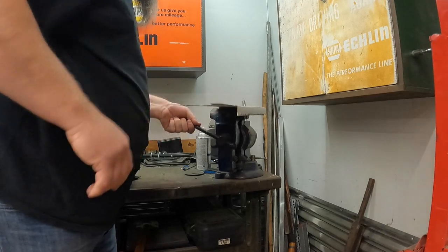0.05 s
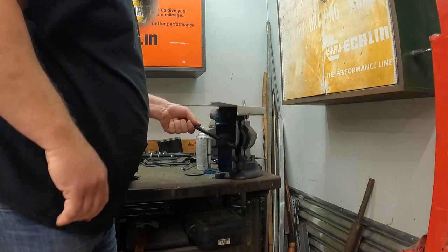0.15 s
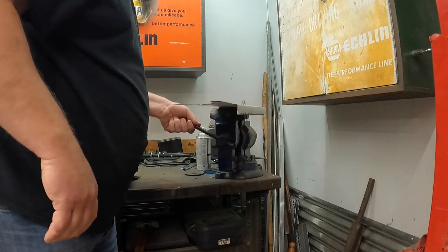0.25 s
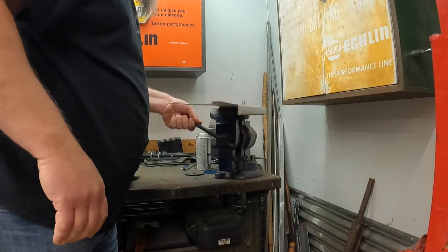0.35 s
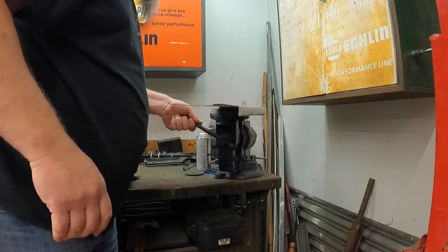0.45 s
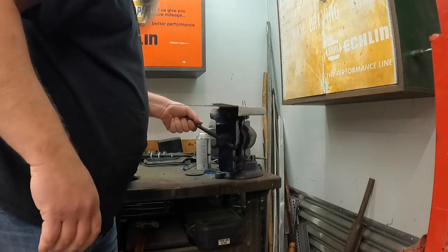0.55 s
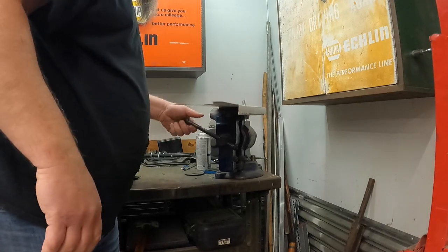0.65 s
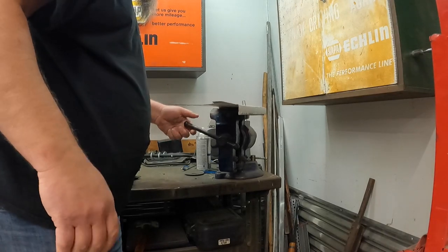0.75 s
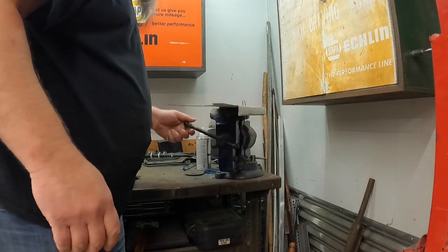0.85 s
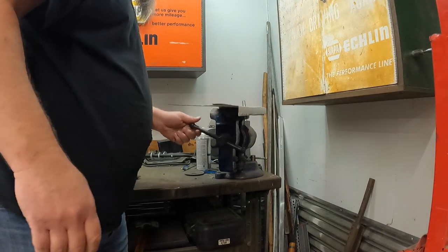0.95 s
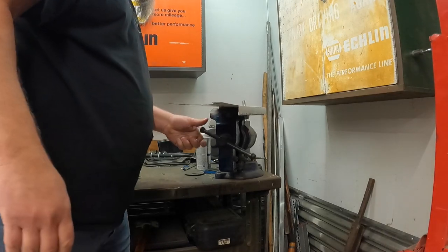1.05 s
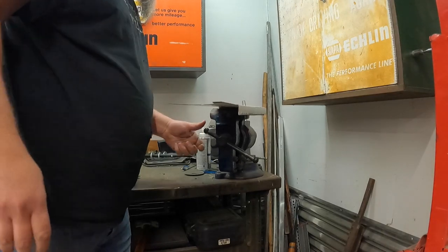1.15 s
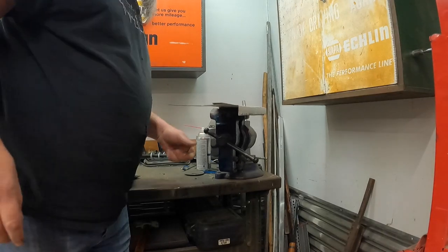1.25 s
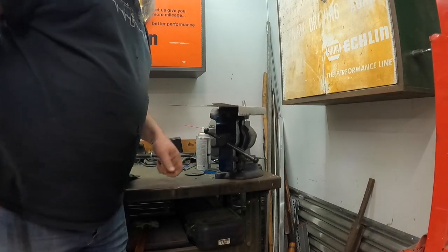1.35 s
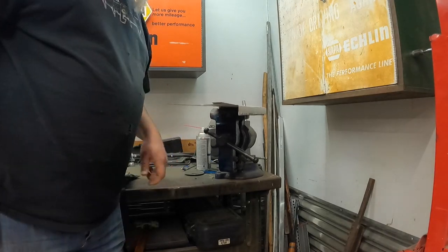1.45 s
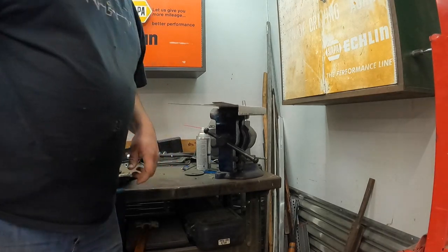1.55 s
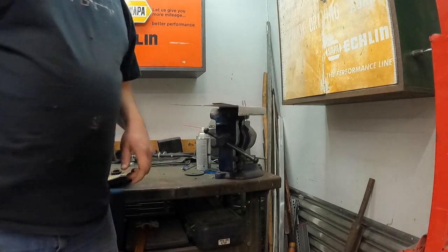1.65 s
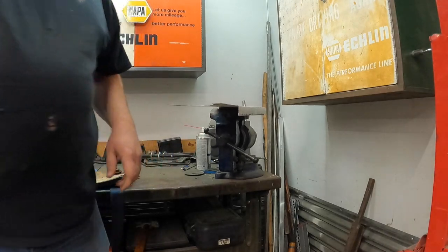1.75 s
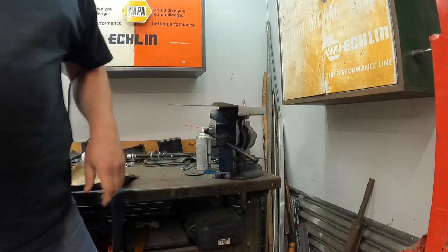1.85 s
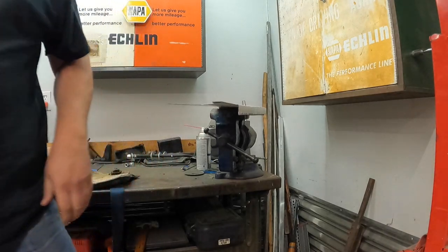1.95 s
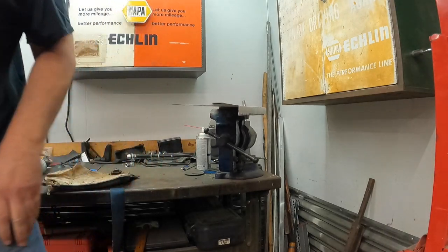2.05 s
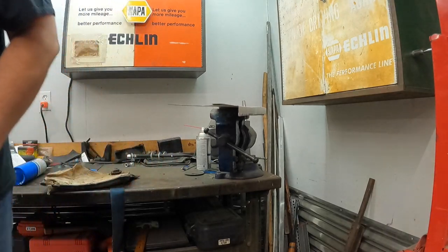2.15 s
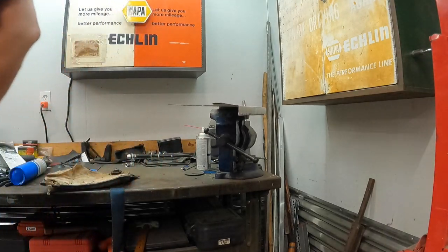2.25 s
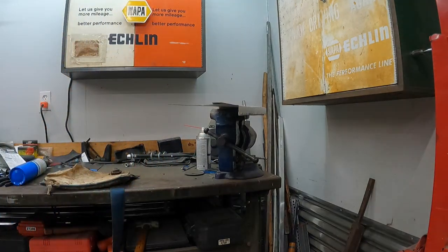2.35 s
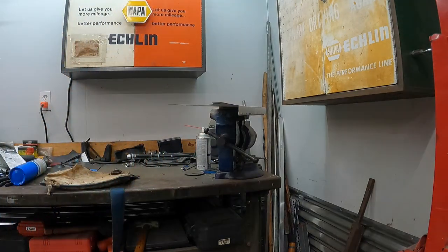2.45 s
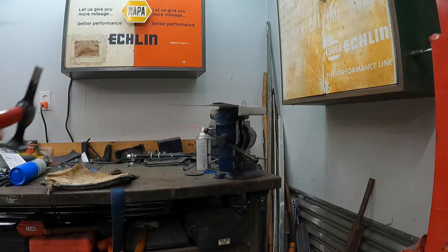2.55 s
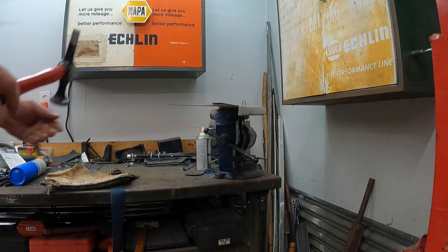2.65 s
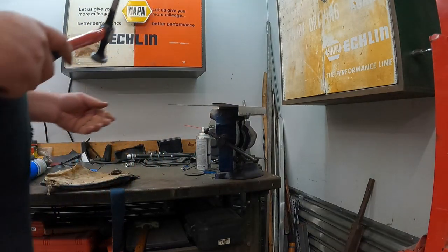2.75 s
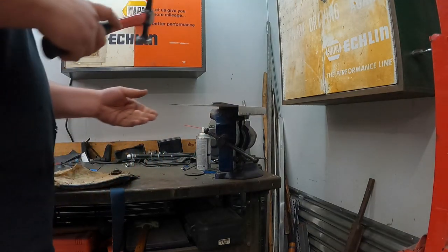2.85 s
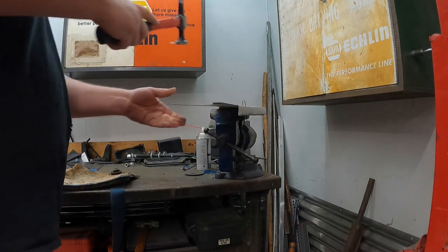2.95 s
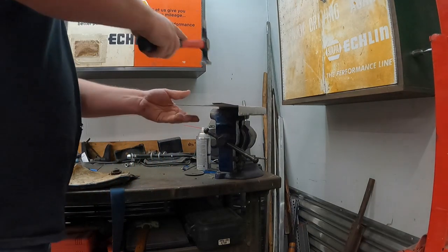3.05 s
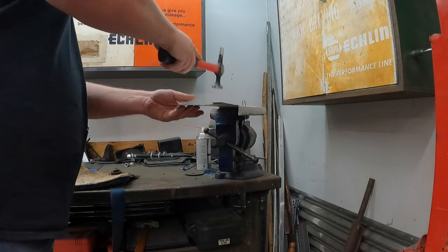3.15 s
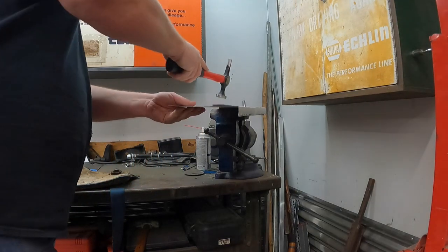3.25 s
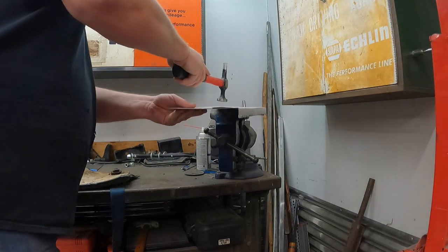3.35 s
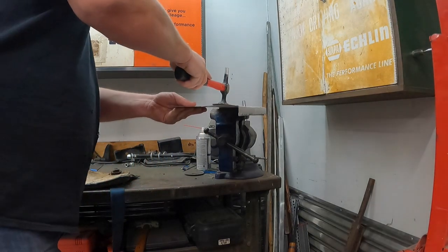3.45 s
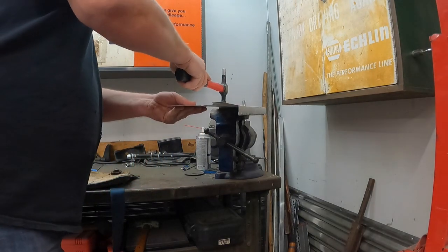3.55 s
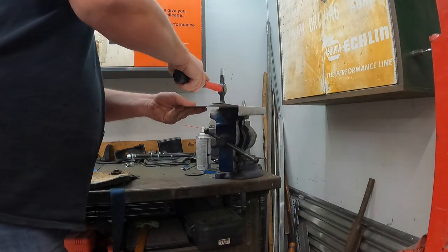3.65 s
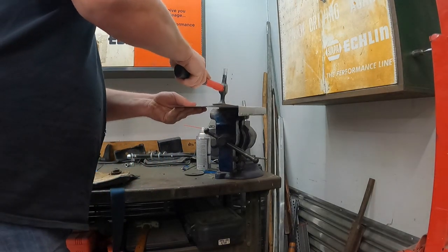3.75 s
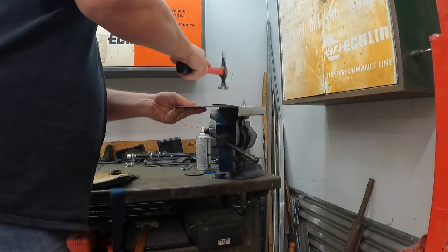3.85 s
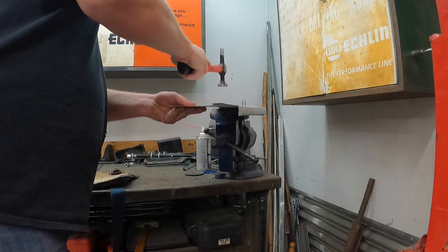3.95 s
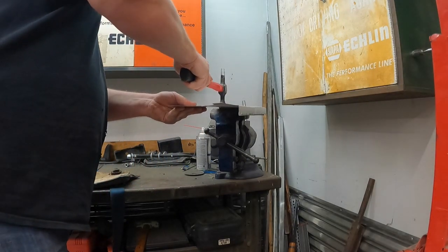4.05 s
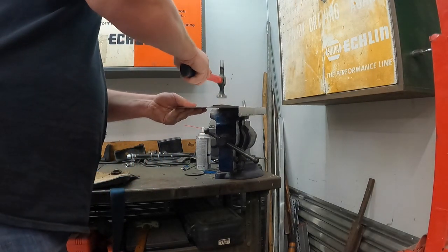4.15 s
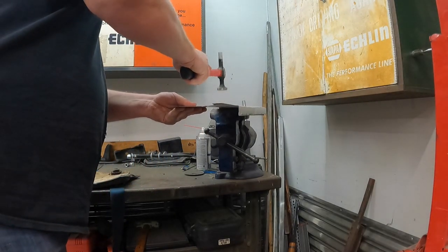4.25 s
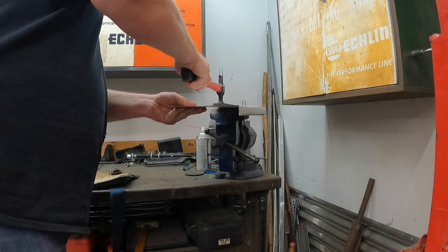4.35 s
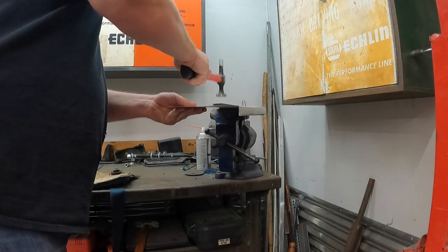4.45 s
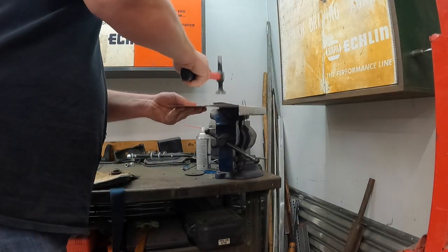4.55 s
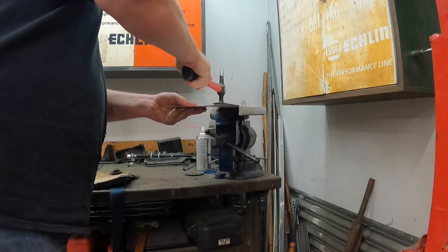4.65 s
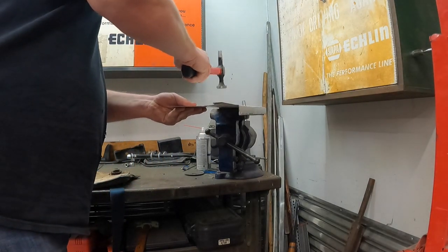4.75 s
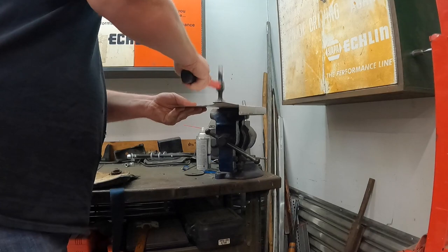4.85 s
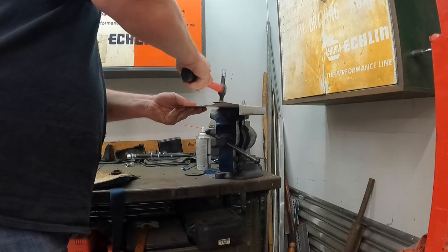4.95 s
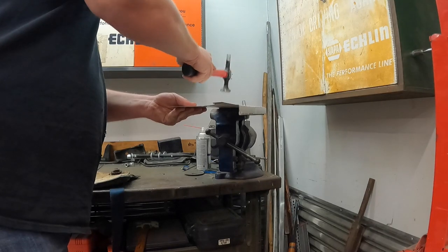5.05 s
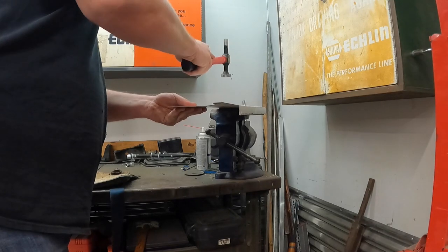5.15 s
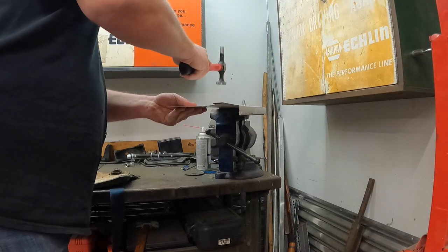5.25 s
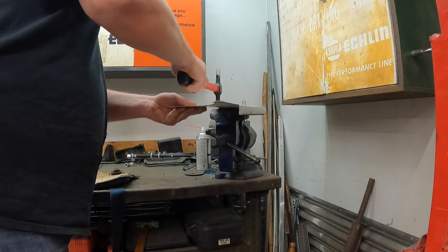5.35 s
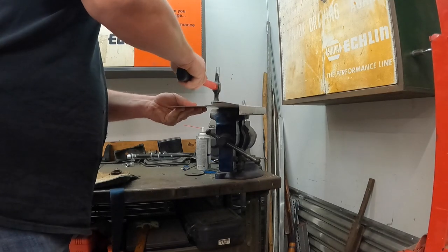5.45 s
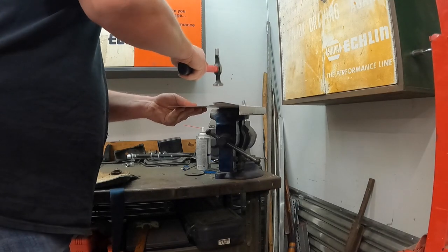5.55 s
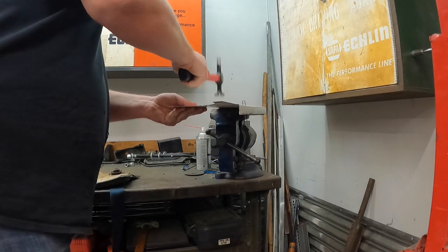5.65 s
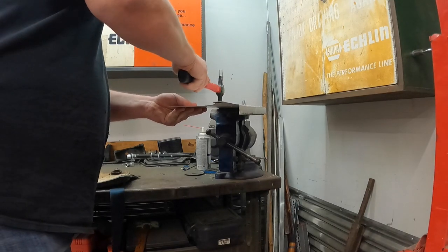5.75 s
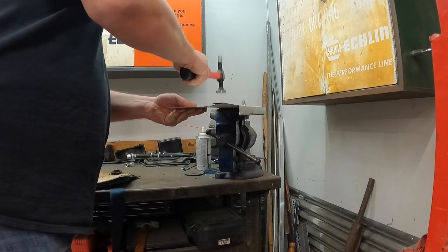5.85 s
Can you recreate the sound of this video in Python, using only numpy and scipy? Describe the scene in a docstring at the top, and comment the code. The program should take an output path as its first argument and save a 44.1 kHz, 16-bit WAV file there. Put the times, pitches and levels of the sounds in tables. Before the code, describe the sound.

Someone moves close to a camera microphone at a workbench: clothing brushes, feet thud softly, and a loose steel bar slides and clacks in a vise at about one second. A quieter stretch of steps and cloth follows. From three and a half seconds, sharp hammer knocks on sheet steel ring briefly, with hollow vise clonk, occasional bench thud and a short hard room tail.

```python
"""Mains hum, low rumble and brushing cloth open the scene, with the soft knock of a vise closing on a steel sheet.
Dull footfalls follow; the steel vise handle scrapes through its hole and knocks against its stop.
Then a hammer strikes the sheet eight times, rebounding once: noise makes the crack and clang, decaying sines
ring sheet, vise and bench, and decaying noise bands answer as the room. Gain control pulls loud passages down."""
import sys
import numpy as np
from scipy import signal
from scipy.fft import rfft, irfft, next_fast_len
from scipy.io import wavfile

SR = 44100
rng = np.random.default_rng(int(sys.argv[2]) if len(sys.argv) > 2 else 0)


def master(y):
    """Save y as 16-bit WAV."""
    cut = np.clip(np.atleast_2d(y).T, -1, 1)
    pcm = np.round(cut * 32767)  # scale
    wavfile.write(sys.argv[1], SR, pcm.astype(np.int16))


N = 260631
TIME = np.arange(N) / SR
AGE = TIME[:2 * SR]  # time since the onset of a single event


def undb(db):
    """Decibels to amplitude gain."""
    return 10 ** (np.asarray(db) / 20)


def across(points, hz):
    """Read (Hz, value) points on a log-frequency axis."""
    f, value = np.transpose(points)
    return np.interp(np.log(hz + 1), np.log(f), value)


def fade(t60_s):
    """Exponential decay, 60 dB down after t60_s."""
    return np.exp(-np.log(1000) * AGE / t60_s)


# Unrelated share between the two microphone ports. Each row: frequency in Hz, side level in dB before widening.
PORT_WIDTH = [(50, -35.5), (150, -23.5), (400, -15.5), (1000, -12.5), (2000, -11), (5000, -12.5),
              (8000, -13.5), (12500, -6)]


def noise(colour, size, wide_db=0):
    """Coloured stereo noise of rms 1; a weak independent side signal sets the ports apart."""
    hz = np.fft.rfftfreq(size, 1 / SR)
    white = rfft(rng.standard_normal((2, size)))
    mid, side = white * undb(across(colour, hz)) * hz / (hz + 20)
    side = side * undb(across(PORT_WIDTH, hz) + wide_db)
    x = irfft([mid + side, mid - side], size)
    return x / x.std()


def tilted(x, slope_db, pivot_hz=2000):
    """Tilt the spectrum by about slope_db per octave: harder contact gives more treble."""
    size = 2 * len(AGE)
    hz = np.fft.rfftfreq(size, 1 / SR)
    tilt = undb(slope_db * np.log2((hz + 100) / pivot_hz))
    return irfft(rfft(x, size) * tilt)[:, :len(AGE)]


def ring(modes, scatter_db):
    """Decaying sine modes; each strike weights them anew, and each port hears its own phase."""
    out = np.zeros((2, len(AGE)))
    draws = rng.standard_normal((len(modes), 3))
    for (hz, db, t60_s), (size, turn, skew) in zip(modes, draws):
        t = AGE[AGE < 1.5 * t60_s]
        decay_per_s = np.log(1000) / t60_s
        wave = np.exp((2j * np.pi * hz - decay_per_s) * t + 1j * np.pi * turn)
        ports = np.exp(.18j * skew * np.array([1, -1]))
        out[:, :len(t)] += undb(db + scatter_db * size) * np.outer(ports, wave).imag
    return out


def crowded_modes(spacing_hz, depth_db):
    """Gain per frequency of a body with countless small resonances; mean power 1."""
    hz = np.fft.rfftfreq(len(AGE), 1 / SR)
    heights = rng.uniform(-1, 1, len(hz))
    gain = undb(depth_db * np.interp(hz / max(spacing_hz, 1), np.arange(len(hz)), heights))
    return gain / np.sqrt(np.mean(gain ** 2))


def through(x, modes, width_hz):
    """Pass a sound through a body's resonances, keeping its level."""
    hz = np.fft.rfftfreq(x.shape[1], 1 / SR)
    body = sum(undb(db) / (1 + 2j * (hz - f) / width_hz) for f, db, _ in modes)
    y = irfft(rfft(x) * body, x.shape[1])
    return y * x.std() / y.std()


def swells(rows):
    """Gain over time of movements that each build up to a peak and die away."""
    power = 0
    for s, db, rise_s, t60_s in rows:
        before, after = np.maximum(s - TIME, 0), np.maximum(TIME - s, 0)
        shape = np.exp(-(before / rise_s) ** 2 - np.log(1000) * after / t60_s)
        power = power + (undb(db) * shape) ** 2
    return np.sqrt(power)


def add(track, s, x):
    """Mix a sound in at time s."""
    start = max(int(s * SR), 0)
    track[:, start:start + x.shape[1]] += x[:, :N - start]


RUMBLE_DB, HUM_DB, MAINS_HZ = -51.5, -46.5, 60
# Still air. Each row: frequency in Hz, density in relative dB per Hz.
AIR_COLOUR = [(60, -2), (90, -6), (180, -11.5), (300, -18.5), (520, -20.5), (800, -26.5), (1500, -24),
              (5000, -35.5), (9000, -45.5), (15000, -64.5)]
AIR_DB = -62.5
# Air pushed against the microphone as the body passes close.
# Each row: peak time in seconds, level in dB, rise in seconds, t60 in seconds.
GUSTS = [(.6, -46.5, 0.22, .8), (2.99, -46, 0.076, 0.43)]
# Steel on the bench still singing from being handled. Each row: frequency in Hz, level in dB, t60 in seconds.
SINGING_MODES = [(485, -48.5, 2.2), (553, -56.5, 2.8), (342, -55, 2.2), (720, -54, 0.6)]


def workshop():
    """Mains hum with its third harmonic, air noise, rumble swelling with gusts, and decaying steel modes."""
    turn = 2 * np.pi * MAINS_HZ * TIME
    third = np.sin(3 * turn)
    hum = np.sqrt(2) * undb(HUM_DB) * (np.sin(turn) + undb(-16.5) * third)
    hum = hum * undb([[-1.1], [1.1]])  # stronger on the right
    rumble_colour = [(20, -9), (45, 5.5), (80, -3), (150, -12), (300, -24.5), (1000, -70.5), (8000, -71.5)]
    rumble = noise(rumble_colour, size=N, wide_db=8.5)
    air = noise(AIR_COLOUR, size=N, wide_db=8.0) * undb(AIR_DB)
    out = hum + rumble * (undb(RUMBLE_DB) + swells(GUSTS)) + air
    add(out, 0, ring(SINGING_MODES, scatter_db=0) * (1 - fade(.02)))
    return out


# Cloth. Each row: frequency in Hz, density in relative dB per Hz.
CLOTH_COLOUR = [(350, -47), (600, -24), (818, -11.5), (1060, 3), (1560, 0), (4400, 0.5), (7550, -5),
                (10600, -16.5), (11900, -12.5), (15000, -46)]
# Moves of the body that brush the clothes.
# Each row: peak time in seconds, level in relative dB, rise in seconds, t60 in seconds.
SWISHES = [(.03, -61.5, 0.045, 1.65), (.5, -69.5, 0.018, 0.63), (1.0, -59, 0.26, 3.8),
           (1.5, -59, 0.024, 0.24), (1.84, -56, 0.12, 4.6), (2.61, -58.5, 0.045, 0.28),
           (2.81, -52.5, 0.097, 1.67), (3.39, -48.5, 0.024, 0.17), (3.53, -66, .05, 1)]


def cloth():
    """Cloth brushes in small uneven strokes: noise under slow swells and a faster random flutter."""
    strokes = np.interp(TIME, np.linspace(0, TIME[-1], num=200), rng.standard_normal(200))
    brush = noise(CLOTH_COLOUR, size=N, wide_db=4.5)
    return brush * swells(SWISHES) * undb(1.0 * strokes - 0.5)


# The vise's hollow body on its bench. Each row: frequency in Hz, density in relative dB per Hz.
BODY_COLOUR = [(150, -26.5), (330, -3), (490, -0.5), (600, -8.5), (715, -2), (900, 0.5), (1100, -5.5),
               (1500, -25), (4000, -52)]
# The jaws close on the sheet. Each row: start in seconds, level in relative dB.
JAW_KNOCKS = [(.052, -40.5)]


def jaws():
    """A muffled knock in the body of the vise: noise with a soft onset and the treble tilted away."""
    out = np.zeros((2, N))
    for s, db in JAW_KNOCKS:
        knock = noise(BODY_COLOUR, size=len(AGE)) * fade(0.26) * (1 - fade(0.014))
        add(out, s, undb(db) * tilted(knock, slope_db=-12.5, pivot_hz=610))
    return out


# Footfalls and soft knocks. Each row: start in seconds, level in relative dB, treble tilt in dB per octave.
STEPS = [(.44, -39, -2), (0.594, -34, -2.5), (0.911, -34, -0.5), (1.773, -33, -3), (2.388, -45.5, -2),
         (2.719, -36, -2.5), (2.855, -28, 3.5), (3.353, -35, -5)]
# Each row: frequency in Hz, density in relative dB per Hz.
STEP_COLOUR = [(40, 12), (110, -5), (190, 7), (350, -12.5), (700, -21), (1600, -25), (4000, -59.5),
               (12000, -75)]


def footsteps():
    """Dull footfalls: low noise with a soft onset, a fast decay and a weaker slow one."""
    out = np.zeros((2, N))
    for s, db, tilt_db in STEPS:
        decay = fade(0.066) + undb(-16) * fade(0.44)
        step = noise(STEP_COLOUR, size=len(AGE)) * decay * (1 - fade(0.0093))
        add(out, s, undb(db) * tilted(step, tilt_db, pivot_hz=205))
    return out


# The handle's steel. Each row: frequency in Hz, level in relative dB, t60 in seconds.
HANDLE_MODES = [(351, -31.5, 0.15), (391.4, -52.5, 2.27), (485, -51, 2.2), (745, -35, 0.31),
                (960, -41, 0.56), (1010, -58, 0.34), (1057, -45, 0.83), (1227, -50, 1.2), (1311, -33, 0.23),
                (1490, -37.5, 0.43), (2270, -57.5, 0.19), (2375, -40, 0.49), (2900, -35.5, 0.21),
                (3620, -32, 0.13), (3950, -38, 0.15), (4420, -40, 0.34), (5200, -53, 0.45),
                (5800, -39, 0.31)]
# Each row: frequency in Hz, density in relative dB per Hz.
HANDLE_COLOUR = [(120, -21), (340, -1.5), (600, 0.5), (1300, 4.5), (2500, -2.5), (5500, -7.5), (8000, -17),
                 (10000, -49.5), (12500, -38), (15000, -69)]
# Steel rubbing on steel. Each row: frequency in Hz, density in relative dB per Hz.
SCRAPE_COLOUR = [(300, -2.5), (1000, -13), (1500, -7.5), (2400, 4), (3200, -22), (3700, -1.5), (4400, -14),
                 (7000, -17), (9500, -33), (15000, -40)]
# The handle slides through its hole, speeding up and slowing down.
# Each row: start in seconds, length in seconds, peak level in relative dB.
SLIDES = [(0.77, .2, -48), (1.008, 0.22, -33.5)]


def handle_slides():
    """The steel bar scrapes in tiny catches: flickering noise, part of it through the bar's modes, follows speed."""
    catches = np.interp(TIME, np.linspace(0, TIME[-1], num=1500), rng.standard_normal(1500))
    speed = 0
    for s, length_s, db in SLIDES:
        speed = speed + undb(db) * np.sin(np.pi * np.clip((TIME - s) / length_s, 0, 1))
    scrape = noise(HANDLE_COLOUR, size=N) * undb(2.5 * catches - 8.0)
    rub = noise(SCRAPE_COLOUR, size=N) * undb(0.72 * catches - 7.5)
    return (through(scrape, HANDLE_MODES, width_hz=140) + rub) * speed


# The handle knocks against its stop.
# Each row: start in seconds, level in relative dB, treble tilt in dB per octave, contact build-up t60 in seconds.
CLANKS = [(0.784, -10.5, -0.5, 0.054), (0.816, -17, -1.5, 0.023), (1.214, 0, 2, 0.0041),
          (1.232, -9, -5, 0.0058), (1.286, -10.5, -2, 0.026), (1.634, -28.5, -2.5, 0.0056)]


def handle_knocks():
    """The bar hits its stop: clattering noise and ringing modes, with a gentler onset for longer contact."""
    out = np.zeros((2, N))
    peaks = crowded_modes(spacing_hz=25, depth_db=7)
    for s, db, tilt_db, contact_s in CLANKS:
        decay = undb(-23.5) * fade(0.091) + undb(-32) * fade(0.43)
        clatter = irfft(rfft(noise(HANDLE_COLOUR, size=len(AGE))) * peaks) * decay
        knock = (clatter + ring(HANDLE_MODES, scatter_db=2.0)) * (1 - fade(contact_s))
        add(out, s, undb(db) * tilted(knock, tilt_db))
    return out


# Contact crack. Each row: frequency in Hz, density in relative dB per Hz.
CRACK_COLOUR = [(100, -7.5), (500, -2.5), (1500, -6.5), (2500, -0.5), (4200, -1), (6000, -3.5), (8000, -6),
                (10000, -19.5), (12500, -8.5), (15500, -46)]


def contact_noise(peaks):
    """Steel meets steel: broadband noise with uneven resonant peaks, not yet decaying."""
    return irfft(rfft(noise(CRACK_COLOUR, size=len(AGE))) * peaks)


CLANG_DB, CLANG_WIDTH_HZ, CLANG_T60_S = -20.5, 700, 0.038


def sheet_clang(contact, overtone_hz):
    """Crowded, heavily damped overtones around the favoured one: band-passed contact noise."""
    band = through(contact, [(overtone_hz, 0, 0)], width_hz=CLANG_WIDTH_HZ)
    return band * undb(CLANG_DB) * fade(CLANG_T60_S)


# The sheet's short overtones, damped by hand and hammer.
# Each row: frequency in Hz, level in relative dB, t60 in seconds.
SHEET_MODES = [(2286, -25, 0.3), (2362, -20.5, 0.18), (2760, -27.5, 0.18), (2896, -25.5, 0.038),
               (3180, -29.5, 0.073), (3305, -23, 0.1), (3810, -16, 0.039), (4030, -25.5, 0.23),
               (4500, -25.5, .12), (4914, -23.5, 0.092), (5220, -26, 0.074), (6980, -24.5, 0.11)]
SHEET_DB = -1.5


def sheet_ring(note_hz, note_t60_s, overtone_hz):
    """The sheet's modes; the main note shifts as the sheet is slid through the jaws."""
    modes = [(note_hz, -16, note_t60_s), (overtone_hz, -20, .13)] + list(SHEET_MODES)
    return ring(modes, scatter_db=0.5) * undb(SHEET_DB)


# The vise and the steel on the bench. Each row: frequency in Hz, level in relative dB, t60 in seconds.
VISE_MODES = [(182, -41, 0.61), (397, -54.5, 2.7), (491.6, -31, 0.29), (522, -50.5, 3.1), (598, -33.5, .28),
              (721, -27.5, .28), (822, -34, .3), (876, -28, .3), (990, -29, .28), (1080, -34, .25),
              (1203, -32, .4), (1585, -37, .42), (1678, -30, .36), (1880, -30, .38), (1970, -37, .4),
              (2245, -32, .42), (2400, -30, .3), (2576, -28, .34), (2897, -29, .33), (3140, -32, .35),
              (3385, -35, .42), (3612, -39, .4), (3866, -30.5, .35), (4480, -33, .3), (4890, -37, .26),
              (5100, -36.5, .34), (5900, -39.5, .31), (7040, -40.5, .31)]
CLONK_DB = -19.5


def vise_ring():
    """The heavy vise takes up the motion gradually, then its modes decay."""
    return ring(VISE_MODES, scatter_db=0.15) * (1 - fade(0.035))


def vise_clonk():
    """The hollow clonk of the vise on its bench: body noise through the vise's resonances."""
    clonk = through(noise(BODY_COLOUR, size=len(AGE)), VISE_MODES, width_hz=31)
    return clonk * undb(CLONK_DB) * fade(0.23) * (1 - fade(0.081))


# The bench top. Each row: frequency in Hz, level in relative dB, t60 in seconds.
BENCH_MODES = [(42, -17.5, 0.04), (63, -18.5, 0.041), (91, -34.5, 0.32), (109.3, -17.5, 0.032),
               (175, -29.5, 0.083), (217, -27.5, 0.04)]


def bench_thud():
    """Low, quickly damped modes of the bench top, stronger on the right."""
    return ring(BENCH_MODES, scatter_db=2.5) * (1 - fade(0.0089)) * undb([[-1.3], [1.3]])


# The room's answer. Each row: frequency in Hz, density in relative dB per Hz.
ROOM_COLOUR = [(60, -13.5), (170, 1.5), (280, -7.5), (480, -5.5), (800, -5), (1400, 1.5), (2400, -3),
               (4400, -3.5), (7000, -12.5), (10000, -21), (12500, -19), (15000, -43)]
# Room decay. Each row: frequency in Hz, t60 in seconds.
ROOM_T60 = [(100, 0.27), (260, 0.54), (700, 0.38), (1800, 0.37), (4800, 0.49), (13000, 0.36)]


def room_tail(peaks, build_s):
    """Dense reflections that build up and die away octave by octave; the lows arrive last."""
    hz = np.fft.rfftfreq(len(AGE), 1 / SR)
    spectrum = rfft(noise(ROOM_COLOUR, size=len(AGE), wide_db=-14.5))
    spectrum = spectrum * peaks ** (hz / (hz + 700))  # the steel's resonances crowd the treble
    centres = np.geomspace(100, 12800, 8)
    out = 0
    for centre, share in zip(centres, np.eye(len(centres))):
        band = irfft(spectrum * across(np.c_[centres, share], hz))
        build = 1 - fade(build_s * np.sqrt(centres[3] / centre))
        out = out + band * fade(across(ROOM_T60, centre)) * build
    return out


ROOM_DB, ROOM_RING_DB = -19.5, -26.5


def room_answer(peaks):
    """The room's tail, plus the vise's notes returned by the walls."""
    tail = room_tail(peaks, build_s=0.1)
    return tail * undb(ROOM_DB) + through(tail, VISE_MODES, width_hz=30) * undb(ROOM_RING_DB)


# Hammer blows; the third is the hammer rebounding. Crack, vise and thud are relative to the strength.
# Each row: start in seconds, strength in relative dB, crack, vise and bench thud in relative dB,
# treble tilt in dB per octave, sheet's main note in Hz, its t60 in seconds, overtone favoured by the strike in Hz.
BLOWS = [(3.5712, -7, -1, 1, -32, -.5, 2383, 0.13, 3360), (3.665, -6, -0.5, 3, -28, 0, 2403, 0.1, 4520),
         (3.686, -9, -2.5, 0.5, -20.5, -4.5, 2380, .06, 4484),
         (4.1418, -1, 0, -2, 4, -0.77, 2453, 0.086, 4390), (4.442, 2, -1, -1, 6, -0.5, 2304, 0.057, 2950),
         (4.7231, 4.5, -3, -7, 2, -1.5, 2300, 0.31, 3300),
         (5.001, 7, -7.5, -3.5, -18.5, -1.75, 2280, 0.21, 3730),
         (5.4871, 7.5, -8, 1, -30, -2, 2335, 0.045, 2780),
         (5.82, 11.5, -7, -5.5, -7, -.5, 2380, 0.087, 3460)]
# Below FIRM_BLOW_DB, clang and room sink further by TAP_DRYNESS dB per dB.
FIRM_BLOW_DB, TAP_DRYNESS, NEAR_WALLS_DB = -3, 1, -30


def hammer():
    """Each blow sums crack, clang, ringing sheet and vise, room and bench thud; all but the thud are tilted."""
    out = np.zeros((2, N))
    narrow = crowded_modes(spacing_hz=14, depth_db=10)
    broad = crowded_modes(spacing_hz=70, depth_db=8)
    for s, strength_db, crack_db, vise_db, thud_db, tilt_db, note_hz, note_t60_s, overtone_hz in BLOWS:
        stir = undb(TAP_DRYNESS * min(strength_db - FIRM_BLOW_DB, 0))
        contact = contact_noise(broad)
        crack = contact * undb(crack_db - 6) * fade(.02)
        clang = sheet_clang(contact, overtone_hz) * stir
        near_walls = contact_noise(broad) * undb(NEAR_WALLS_DB) * stir * fade(0.42)
        sheet = sheet_ring(note_hz, note_t60_s, overtone_hz)
        vise = (vise_ring() + vise_clonk()) * undb(vise_db)
        thud = bench_thud() * undb(thud_db)
        room = room_answer(narrow) * stir
        steel = tilted(crack + clang + near_walls + sheet + vise + room, tilt_db)
        add(out, s, undb(strength_db) * (thud + steel))
    return out


PORT_LAG_S = 0.000014


def from_vise(x):
    """The vise stands a little to the right, so its sound reaches the left port a moment later."""
    size = next_fast_len(N + SR)
    hz = np.fft.rfftfreq(size, 1 / SR)
    lag = np.exp(-2j * np.pi * np.outer([PORT_LAG_S, 0], hz))
    return irfft(rfft(x, size) * lag, size)[:, :N]


def scene():
    """Everything heard at the bench."""
    at_vise = jaws() + handle_slides() + handle_knocks() + hammer()
    return workshop() + cloth() + footsteps() + from_vise(at_vise)


def lagged(x, time_s):
    """Follow a signal sluggishly: one-pole smoothing with the given time constant."""
    keep = np.exp(-1 / (time_s * SR))
    return signal.lfilter([1 - keep], [1, -keep], x)


# Highest average level allowed, time constant of the average, time constant of the gain's movement.
GAIN_TOP_DB, GAIN_MEMORY_S, GAIN_SLEW_S = -32.5, 1, 0.21


def gain_control(x):
    """Turn everything down, hum included, while the smoothed rms level is above the limit."""
    power = lagged(lagged(np.mean(x ** 2, axis=0), GAIN_MEMORY_S), GAIN_SLEW_S)
    return x / np.maximum(np.sqrt(power) / undb(GAIN_TOP_DB), 1)


TOP_HZ = 15600


def record(dry):
    """The camera rides its gain, rounds the highest peaks and cuts the top."""
    rounded = np.tanh(.7 * gain_control(dry)) / .7
    low_pass = signal.ellip(10, .2, 80, TOP_HZ, fs=SR, output="sos")
    return signal.sosfilt(low_pass, rounded)


dry = scene()
out = record(dry)
master(out)
```